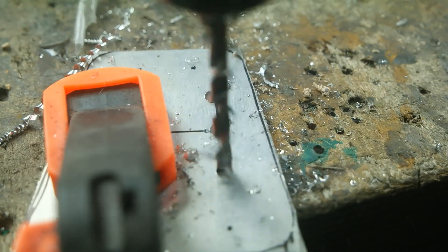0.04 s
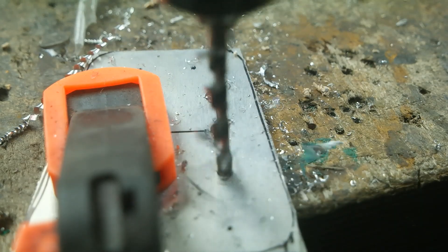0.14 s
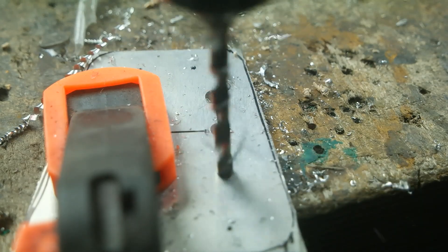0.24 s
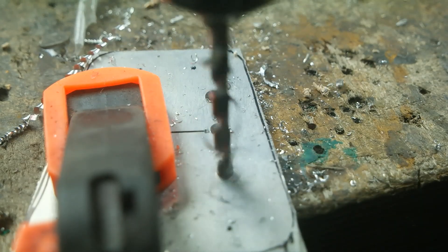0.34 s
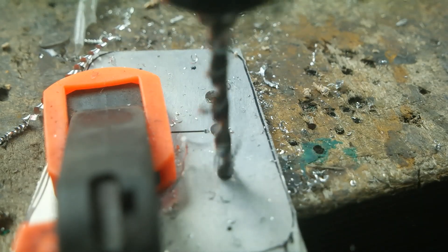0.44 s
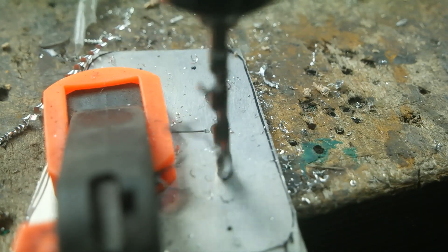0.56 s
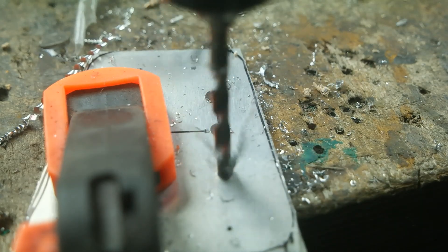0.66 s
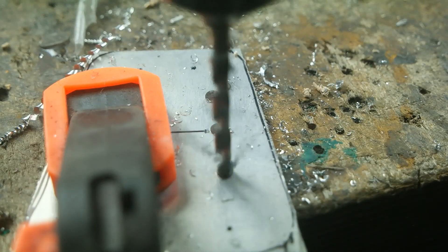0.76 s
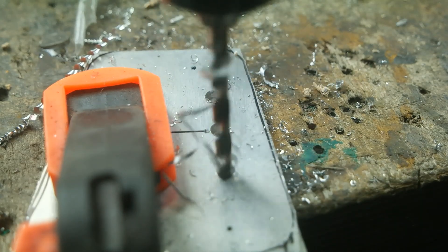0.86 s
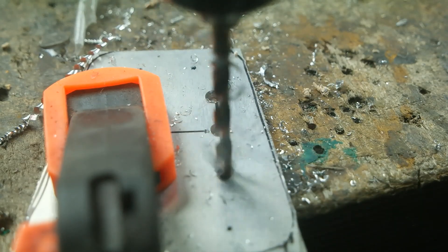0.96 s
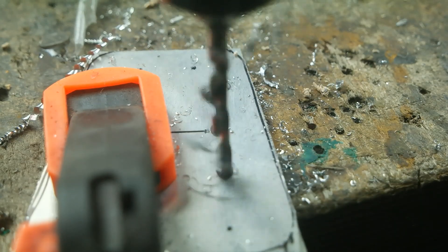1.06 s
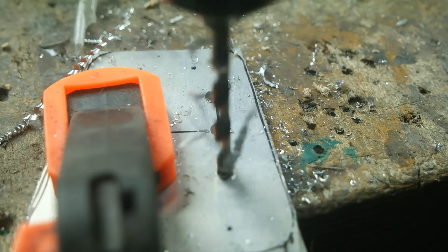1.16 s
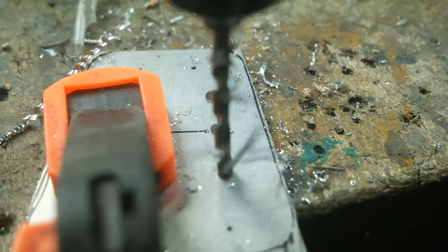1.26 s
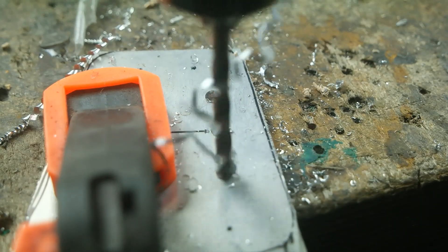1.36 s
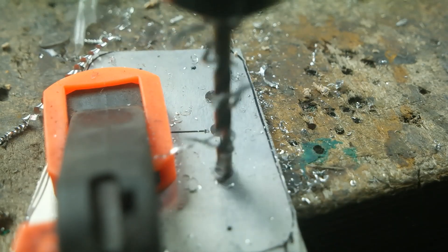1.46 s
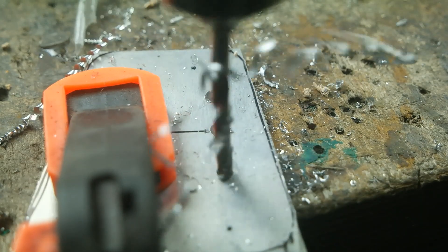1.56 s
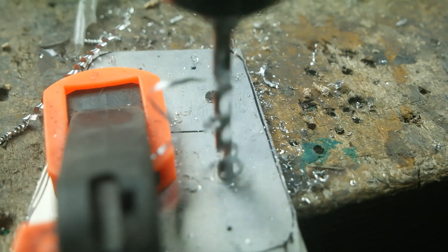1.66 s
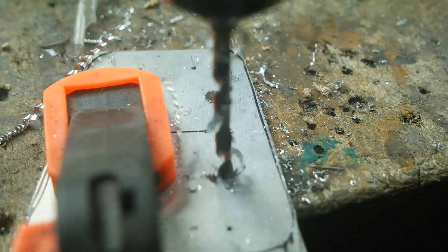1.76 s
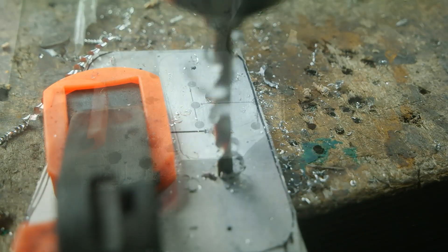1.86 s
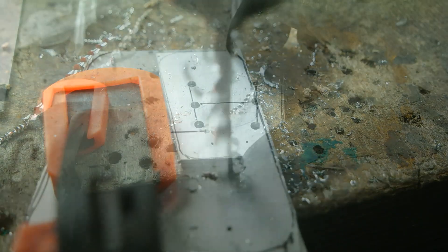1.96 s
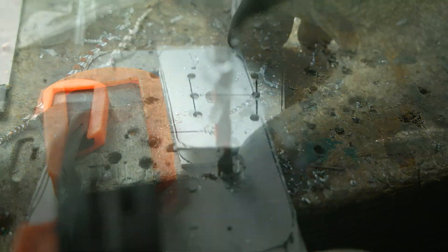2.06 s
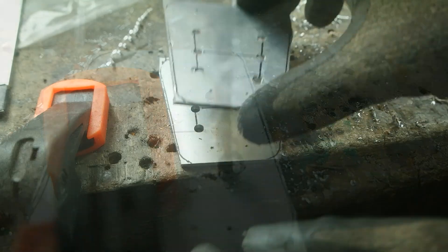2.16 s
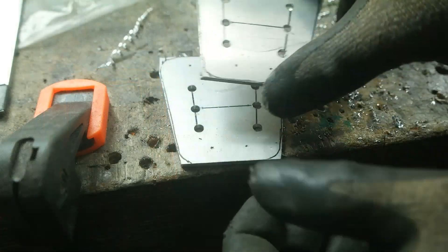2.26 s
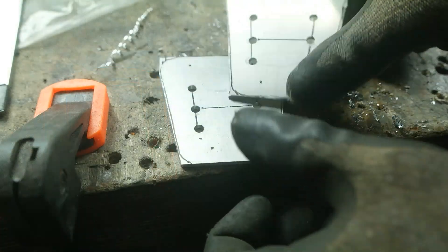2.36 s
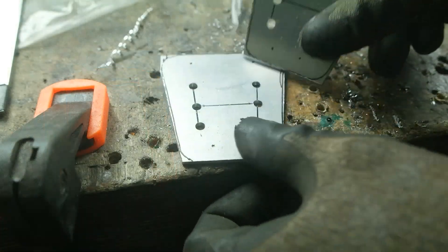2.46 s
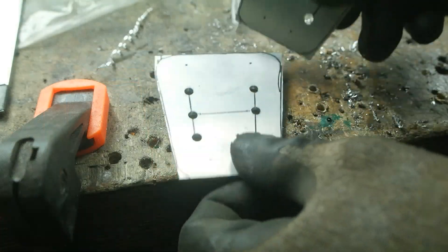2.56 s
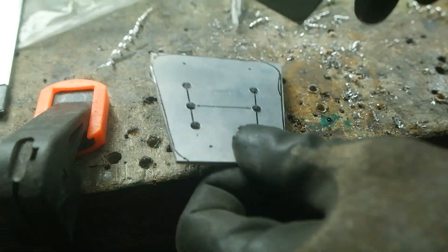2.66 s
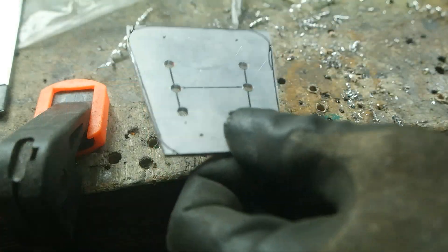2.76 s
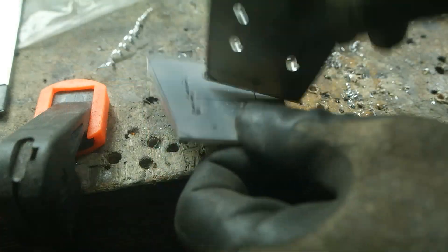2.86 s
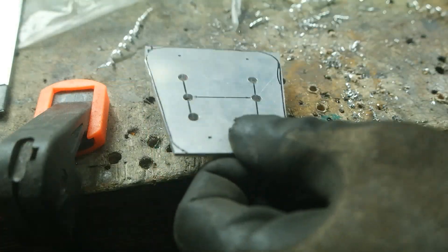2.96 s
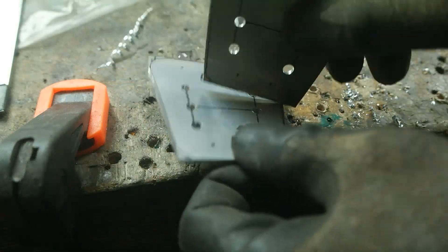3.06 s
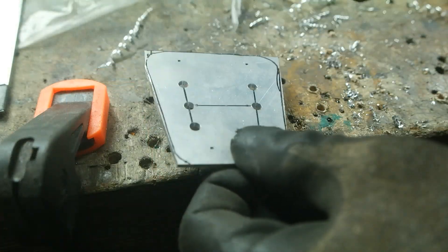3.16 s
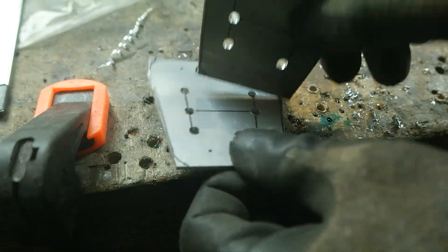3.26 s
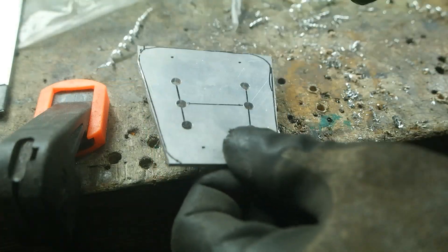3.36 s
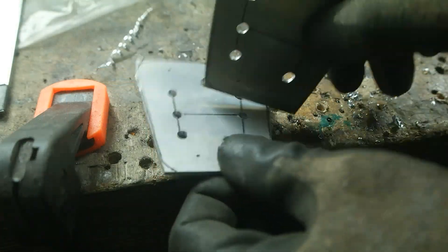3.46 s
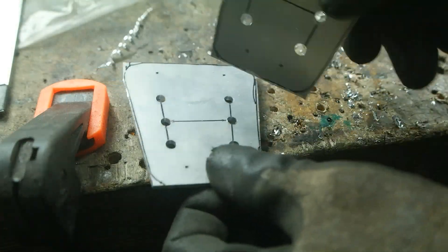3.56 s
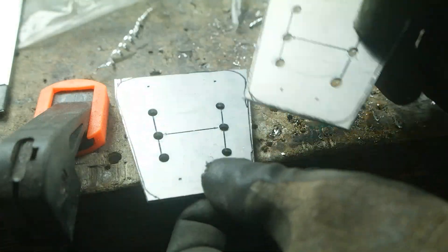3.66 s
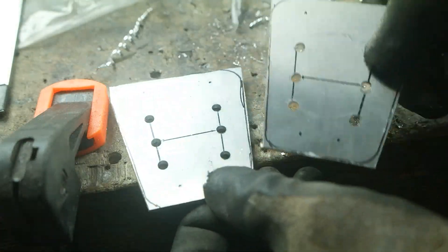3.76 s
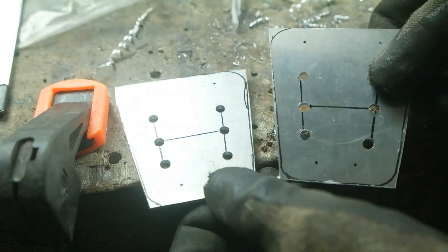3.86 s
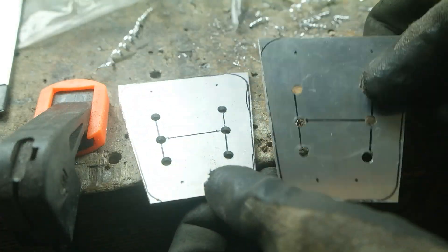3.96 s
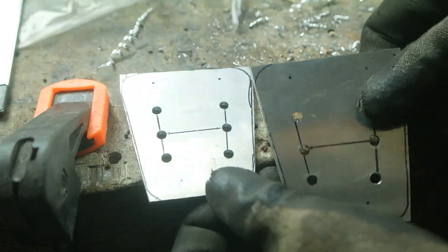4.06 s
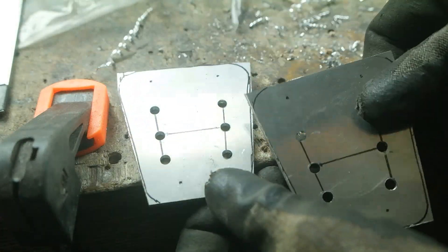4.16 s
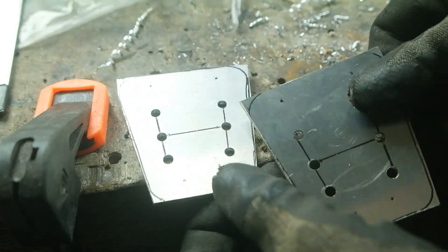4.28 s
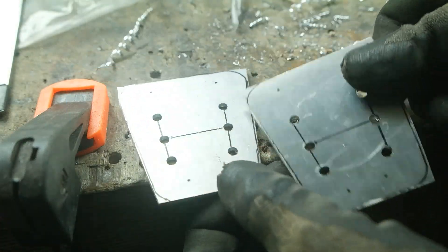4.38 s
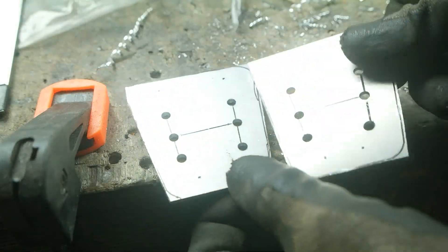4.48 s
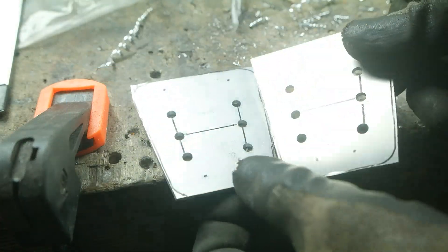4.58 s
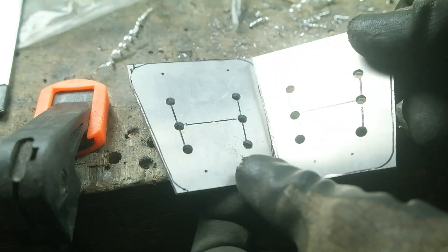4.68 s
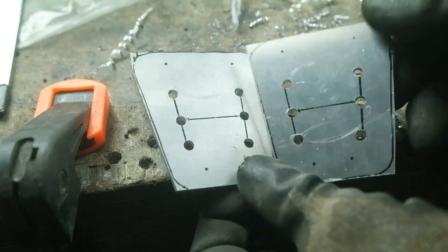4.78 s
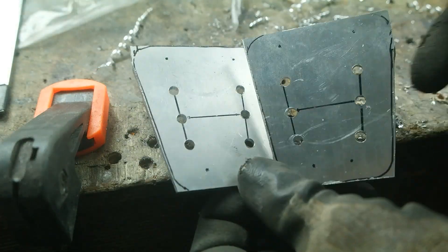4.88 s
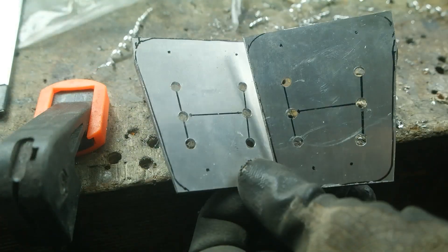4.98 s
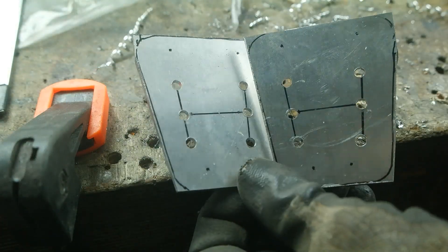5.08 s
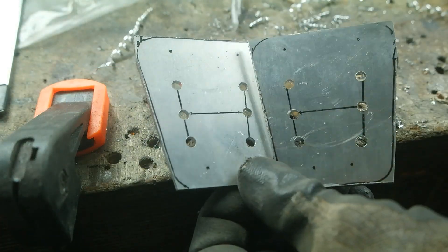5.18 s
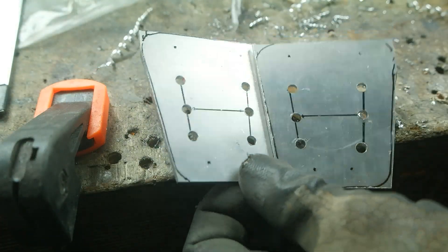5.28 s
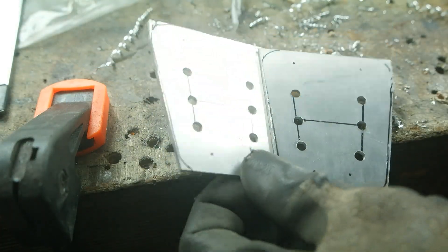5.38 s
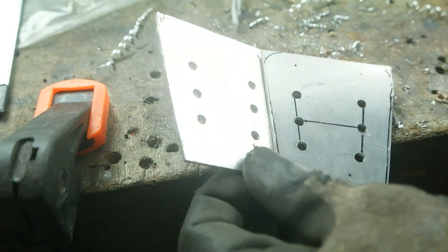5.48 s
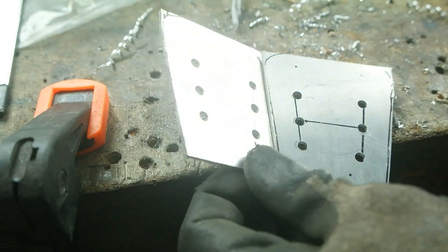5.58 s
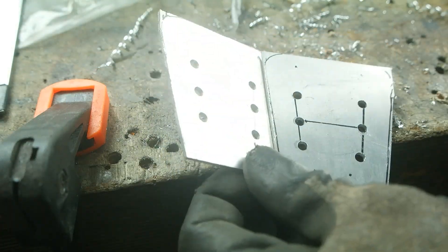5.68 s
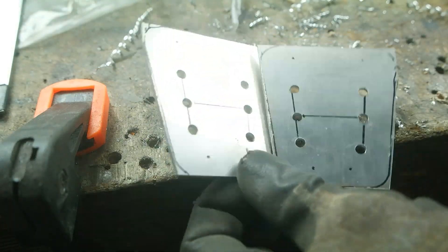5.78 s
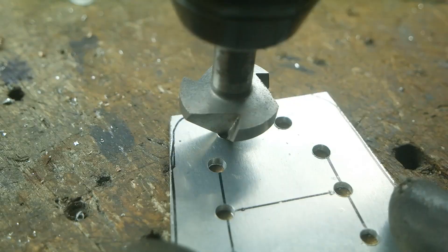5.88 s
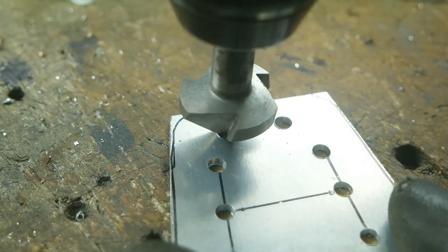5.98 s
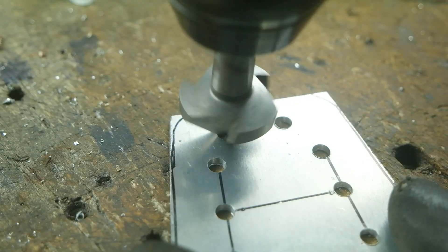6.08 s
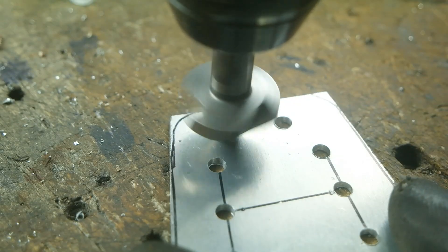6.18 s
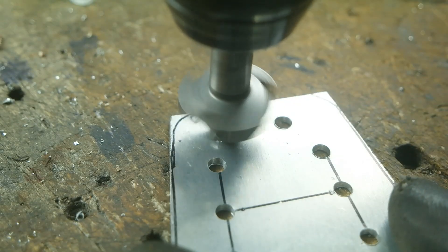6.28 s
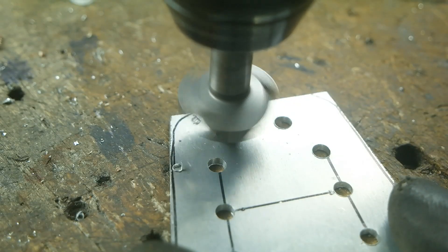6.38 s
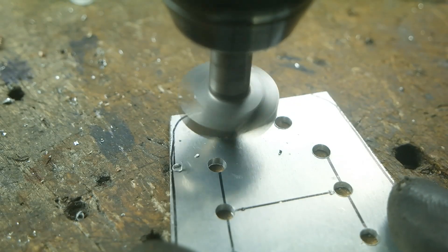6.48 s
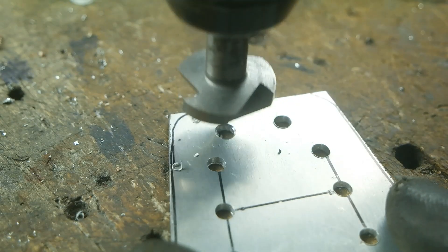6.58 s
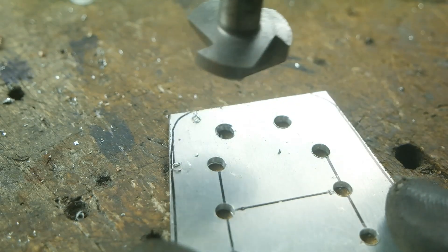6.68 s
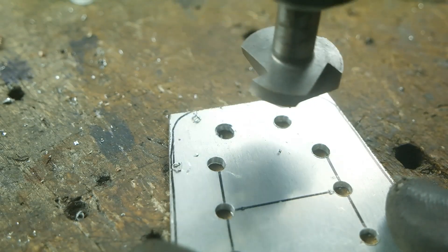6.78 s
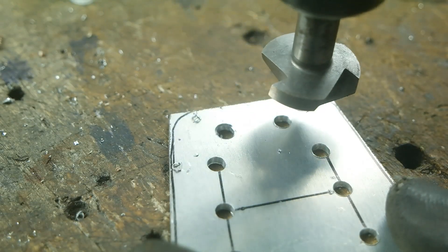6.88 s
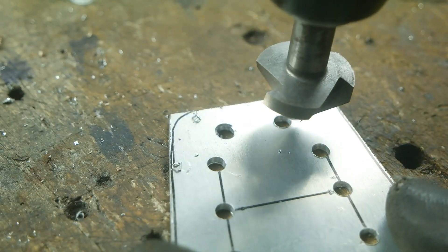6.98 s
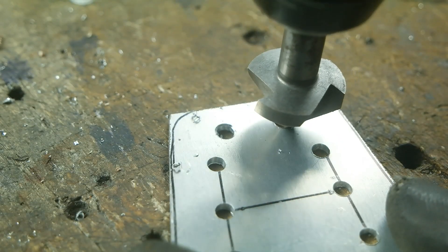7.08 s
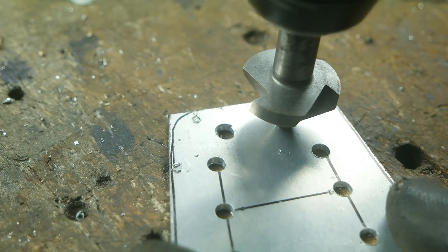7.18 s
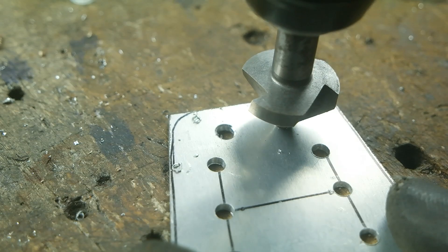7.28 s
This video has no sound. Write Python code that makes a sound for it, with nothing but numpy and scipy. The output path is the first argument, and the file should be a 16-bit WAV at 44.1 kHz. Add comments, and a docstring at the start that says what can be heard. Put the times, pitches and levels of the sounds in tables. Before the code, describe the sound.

Gritty drilling with a geared whine stops, loud distorted steel clacks echo in a workshop, and a short drill burst scrapes a hole's rim.

```python
"""An electric drill bores through a steel plate clamped to a workbench: gear tones, rumble and gritty cutting.
Gloved hands then slide and knock two small plates together, hard enough to overload the recorder:
decaying steel tones with bursts of shaped noise. A countersink is set on a hole, spun up in two
quick surges of whine and scraping, and set on the next hole. Fading noise makes the workshop ring softly."""
import sys
import numpy as np
from scipy import signal
from scipy.fft import rfft, irfft, next_fast_len
from scipy.io import wavfile

SR = 44100
rng = np.random.default_rng(int(sys.argv[2]) if len(sys.argv) > 2 else 0)


def transcribe(signal):
    """Save signal, clipped to [-1, 1], as a 16-bit WAV file at the path in sys.argv[1]."""
    frames = np.atleast_2d(signal).T
    limited = np.clip(frames, -1, 1)
    pcm = np.round(limited * 32767).astype(np.int16)
    wavfile.write(sys.argv[1], SR, pcm)


N = 323694
TIME = np.arange(N) / SR

# The ways a steel plate vibrates. Each row: pitch in Hz, relative level in dB, time to fall 60 dB in seconds.
PLATE_MODES = [(1950, -10, .025), (2130, -9, .03), (2940, 0, .05), (3130, -12, .03), (3720, -22, .03),
               (4950, -15, .025), (5520, -8, .035), (7680, -17, .03), (10500, -21, .03), (11080, -15, .04),
               (11920, -16, .035), (12330, -19, .035), (14100, -19, .035), (14600, -19, .035)]


def amp(db):
    """Turns decibels into a gain."""
    return 10 ** (np.asarray(db) / 20)


def unit(x):
    """Scales a sound to an average strength (rms) of 1."""
    return x / np.sqrt(np.mean(x ** 2) + 1e-20)


def read(points, hz):
    """Reads a table of frequency and value, with straight lines between points on a log-frequency axis."""
    f, value = np.transpose(points)
    return np.interp(np.log(hz + 1), np.log(f + 1), value)


def level(rows):
    """Gain from rows of seconds and dB, silent outside the table's times."""
    seconds, db = np.transpose(rows)
    inside = (TIME >= seconds[0]) & (TIME <= seconds[-1])
    return amp(np.interp(TIME, seconds, db)) * inside


def swell(s, hold_s, rise_db_per_s, fall_db_per_s):
    """A gain that rises to 1 at time s, holds, and falls away."""
    before_s = np.maximum(s - TIME, 0)
    after_s = np.maximum(TIME - s - hold_s, 0)
    return amp(-rise_db_per_s * before_s - fall_db_per_s * after_s)


def strongest_swell(rows, rise_db_per_s, fall_db_per_s):
    """Where several swells overlap, the strongest sets the gain."""
    swells = [amp(db) * swell(s, hold_s, rise_db_per_s, fall_db_per_s) for s, hold_s, db in rows]
    return np.max(swells, axis=0)


def dying(t, t60):
    """Exponential decay that falls 60 dB in t60 seconds."""
    return np.exp(-np.log(1000) * t / t60)


def colour(x, points):
    """Filters a sound by a table of Hz and dB."""
    size = next_fast_len(x.shape[-1] + 2048)
    gain = amp(read(points, np.fft.rfftfreq(size, 1 / SR)))
    return irfft(rfft(x, size) * gain, size)[..., :x.shape[-1]]


def noise(points, size=N):
    """Coloured noise of rms 1."""
    return unit(colour(rng.standard_normal(size), points))


def wander(rate_hz):
    """Random drift of rms 1, with straight lines between rate_hz random points a second."""
    knots = rng.standard_normal(8192)
    return unit(np.interp(TIME * rate_hz, np.arange(len(knots)), knots))


def grit(grains_hz, spread_db, share):
    """Tiny fractures of uneven size over smooth friction; share is the grains' part of the power."""
    hits = rng.random(N) < grains_hz / SR
    size = amp(spread_db * np.minimum(rng.exponential(1, N), 2))
    grains = hits * rng.standard_normal(N) * size
    return np.sqrt(share) * unit(grains) + np.sqrt(1 - share) * rng.standard_normal(N)


def add(track, s, sound):
    """Mixes a sound in at s seconds."""
    part = track[round(s * SR):][:len(sound)]
    part += sound[:len(part)]


def drill(sway=0.0018, jitter=0.0014, throb=0.65, flutter=0.31, hum_db=-1, cut_db=-21, rumble_db=-35):
    """Gears sing over the cutting edges; the load swings once every turn of the chuck."""
    # Motor hum. Each row: pitch in Hz at the table's mesh rate, relative level in dB.
    motor_tones = [(161.5, -51), (215.3, -47), (269.2, -42.5)]
    # Gear tones. Each row: pitch in Hz at the table's mesh rate, level in dB under full load.
    gear_tones = [(646.0, -39), (861.3, -49), (1249, -44), (1292, -37), (1771, -45), (1895, -37),
                  (2261, -45), (2417, -37), (2536, -43), (2934, -44), (3214, -45), (3445, -47),
                  (3871, -36.5), (4307, -43), (4850, -39)]
    # Colour of the cutting. Each row: frequency in Hz, relative dB per Hz.
    cutting = [(80, -68), (300, -16.5), (900, -13), (1350, 0.5), (1620, -6.5), (1900, 4.5), (2150, -1),
               (2900, 3.5), (3700, -3), (5000, -3), (7300, -5.5), (9500, -10.5), (11500, -9), (13000, -12),
               (16000, -7.5)]
    # Colour of the low rumble. Each row: frequency in Hz, relative dB per Hz.
    rumble = [(30, -43), (100, -34.5), (150, -19), (215, -12), (290, -2.5), (370, -10.5), (520, -6.5),
              (800, -6), (1300, -17), (2800, -19.5), (6000, -42.5), (15000, -48)]
    table_mesh_hz, teeth = 645, 60  # the tables' mesh rate; gear teeth per turn of the chuck
    on = TIME < 2.044  # the drill is silent after this many seconds

    # the trigger is let go: the motor coasts, slower and quieter
    release_s, coast_s, coast_db_per_s = 1.707, 0.79, 31.5
    coasting_s = np.maximum(TIME - release_s, 0)
    motor = amp(-coast_db_per_s * coasting_s)

    # the gear mesh rate holds, then sags as the bit digs in
    free_mesh_hz, sag_from_s, sag_hz_per_s = 646.5, .92, 58
    sagging_s = np.clip(TIME - sag_from_s, 0, release_s - sag_from_s)
    mesh_hz = (free_mesh_hz - sag_hz_per_s * sagging_s) * np.exp(-coasting_s / coast_s)
    chuck = 2 * np.pi * np.cumsum(mesh_hz) / SR / teeth  # angle in radians
    uneven = 1 + sway * np.sin(chuck) + jitter * wander(90)
    turns = np.cumsum(mesh_hz * uneven) / SR  # gear mesh cycles so far

    # the bit comes out of the cut over lift_s; only the brushes' hiss stays, idle_db against the cutting
    cut_end_s, lift_s, idle_db = 1.864, 0.072, -23
    in_cut = np.clip((cut_end_s - TIME) / lift_s, 0, 1)
    cut = np.sqrt(in_cut + amp(idle_db) ** 2) * motor

    # the bit grabs once and the motor's hum swells, by as much as its full-speed level
    grab = swell(1.7, 0.037, rise_db_per_s=250, fall_db_per_s=250)
    hum_load = amp(hum_db) * (motor ** 3 + grab)
    gear_load = (cut * motor) ** 2

    sound = amp(rumble_db) * motor * noise(rumble)
    # the load swings tones near this multiple of the mesh rate most deeply, over this many octaves
    throb_order, throb_octaves = 2.5, .9
    for tones, load in ((motor_tones, hum_load), (gear_tones, gear_load)):
        for hz, db in tones:
            octaves = np.log2(hz / (throb_order * table_mesh_hz))
            depth = throb * np.exp(-(octaves / throb_octaves) ** 2)
            swing = depth * np.sin(chuck[on] + 2 * np.pi * rng.random())
            tone = np.sin(2 * np.pi * (hz / table_mesh_hz * turns[on] + rng.random()))
            unsteady = 1 + swing + flutter * wander(44.85)[on]
            sound[on] += np.sqrt(2) * amp(db) * load[on] * unsteady * tone

    # the cutting swells four times a turn, and more gently once a turn
    bite = amp(.45 * np.sin(4 * chuck) + 0.33 * np.sin(chuck) + 0.16 * wander(260))
    chips = unit(colour(grit(grains_hz=2640, spread_db=8.5, share=0.19), cutting) * bite)
    return (sound + amp(cut_db) * cut * chips) * on


def plate_ring(t, bright_db):
    """The plate's modes, damped by the grip; bright_db tilts them per octave."""
    hz, db, t60 = np.transpose(PLATE_MODES)[:, :, None]
    phase = 2 * np.pi * rng.random(hz.shape)
    strength = amp(db + bright_db * np.log2(hz / hz[1]))
    return (strength * dying(t, t60) * np.sin(2 * np.pi * hz * t + phase)).sum(0)


def plates(crack_db=-5, crack_t60=0.034, knock_t60=0.024, contact_s=0.00082, hiss_db=-1, drag_db=-12):
    """Each blow cracks, rings the steel and knocks the bench; sliding rubs the same modes.

    Gives the direct sound and what goes to the room."""
    # Plate against plate. Each row: start in seconds, level in dB, then relative to that
    # the ring in dB, the bench knock in dB and the sound sent to the room in dB.
    clacks = [(2.423, -4, -11.5, -26, -19), (2.447, -3.5, -16, -14, 8.5), (2.495, -8.5, -5, -8, 0),
              (2.662, 2.5, -28, -19.5, -10.5), (2.9174, 8, -3.5, -19.5, -0.5),
              (3.097, 3.5, -2.5, -15.5, 1.5), (3.291, 2, 0, -15, -3.5), (3.296, -2, -16, -15.5, 5.5),
              (3.4868, 5, -10, -16.5, 3), (4.491, -46.5, 5.5, 4, -2), (4.558, -46, 5, -16, -5),
              (4.666, -48.5, 7.5, 6, 6.5), (4.701, -49, 2, 7.5, -2), (4.822, -53.5, -1.5, -5, -1)]
    # One plate sliding on the other. Each row: start of the hold in seconds, hold in seconds, ring in dB,
    # ring tilt in dB per octave, rasp in dB relative to the ring.
    slide_rows = [(2.36, 0.024, -83, 4, -8), (2.495, 0.025, -20, 12, -1), (4.047, 0.022, -57, 6, -6),
                  (4.32, 0.035, -60.5, 5, -13.5), (4.438, .02, -61, 11.5, -10), (4.52, 0.14, -62, 3, -16)]
    # Colour of the crack and of the rubbing hiss. Each row: frequency in Hz, relative dB per Hz.
    crack_colour = [(40, -15.5), (300, -12.5), (1300, -5.5), (2000, 4), (3200, 9), (4400, 1.5), (5400, 5.5),
                    (6500, -5.5), (7700, 2), (9600, -5.5), (12000, -5), (13300, 0), (14500, 0.5),
                    (16000, -13.5)]
    # Colour of the wooden bench. Each row: frequency in Hz, relative dB per Hz.
    bench_knock = [(40, -27.5), (150, -19), (300, -7.5), (600, -9), (1000, -5.5), (2000, -16.5),
                   (8000, -49)]
    # Rubbing excites the plate's modes unevenly. Each row: frequency in Hz, gain in dB.
    squeal_colour = [(2000, -10), (3000, -2), (4000, -6), (4950, -2), (5500, 5), (7700, -3), (11000, -2),
                     (15000, -4)]
    bright_db = 1.5  # tilt of a blow, per octave
    t = np.arange(SR // 6) / SR
    slides, blows, feed = np.zeros(N), np.zeros(N), np.zeros(N)

    rub = grit(grains_hz=1540, spread_db=0, share=0.4)
    friction = amp(hiss_db) * unit(colour(rub, crack_colour)) + amp(drag_db) * noise(bench_knock)
    for s, hold_s, db, tilt_db, rasp_db in slide_rows:
        ring = colour(plate_ring(t, tilt_db), squeal_colour)
        squeal = unit(signal.oaconvolve(rub, ring)[:N])
        gain = amp(db) * swell(s, hold_s, rise_db_per_s=281, fall_db_per_s=497.5)
        slides += gain * (squeal + amp(rasp_db) * friction)

    tilt_from_hz = PLATE_MODES[1][0]
    tilted = [(hz, band_db + bright_db * np.log2(max(hz / tilt_from_hz, 1))) for hz, band_db in crack_colour]
    for s, db, ring_db, knock_db, room_db in clacks:
        crack = amp(crack_db) * noise(tilted, size=len(t)) * dying(t, crack_t60)
        knock = amp(knock_db) * noise(bench_knock, size=len(t)) * dying(t, knock_t60)
        ring = amp(ring_db) * plate_ring(t, bright_db)
        onset = 1 - np.exp(-t / contact_s)
        blow = amp(db) * (ring + crack + knock) * onset
        add(blows, s, blow)
        add(feed, s, amp(room_db) * blow)
    return slides + blows, slides + feed


def countersink(scrape_db=-2.0):
    """The flutes scrape the rim of the hole, brighter as they cut in, and ring the bit."""
    # How hard the flutes bite. Each row: time in seconds, relative level in dB.
    bite = [(6.034, -32), (6.095, -14.5), (6.235, -10.5), (6.32, -16), (6.612, -17.5), (6.62, -32),
            (6.65, -35.5)]
    # Colour of the scraping. Each row: frequency in Hz, relative dB per Hz.
    scrape_colour = [(59, -69), (100, -31), (210, -15.5), (328, -19.5), (406, -19), (481, -16.5),
                     (1060, -12.5), (1610, -16), (2630, -4), (2990, -6), (4470, -2), (7140, -2.5),
                     (8280, -5.5), (10200, -4.5), (16000, -11.5)]
    # Extra filter at first touch, when the scraping is dull. Each row: frequency in Hz, gain in dB.
    dull = [(100, -0.5), (1200, 5.5), (2500, 2.5), (6500, 2), (9000, -5.5), (15000, -9)]
    brighten_s = 0.23
    rough = grit(grains_hz=1860, spread_db=2.0, share=0.21) * amp(1.1 * wander(170))
    scrape = unit(colour(rough, scrape_colour))
    depth = np.clip((TIME - bite[0][0]) / brighten_s, 0, 1) ** 2
    scrape = depth * scrape + (1 - depth) * colour(scrape, dull)
    ring_hz, ring_width_hz, ring_db = 5390, 25, -18  # the bit's own ring
    resonance = signal.iirpeak(ring_hz, ring_hz / ring_width_hz, SR)
    ring = amp(ring_db) * unit(signal.lfilter(*resonance, scrape))
    return amp(scrape_db) * level(bite) * (scrape + ring)


def whine(jitter=.005, flutter=.5):
    """The motor climbs toward its top speed with each surge; the gears are loudest while it strains."""
    # Tones of the whine. Each row: multiple of the shaft rate, relative dB in the first surge,
    # relative dB in the second.
    tone_rows = [(1, -25, -14), (3, -16, -9), (4, -14, -30), (5, -30, -2), (9, -20, -4), (11.25, -20, 0),
                 (12, -2, -30), (15, -20, -4), (16, 0, -30), (18, -20, 0), (20, -2, -6), (22.5, -20, -1),
                 (24, -4, -18), (28, -5, -14), (30, -20, 0), (32, -6, -20), (33.75, -20, 1), (36, -8, -3)]
    # The bit and plate radiate best in the middle treble. Each row: frequency in Hz, gain in dB.
    radiation = [(100, -35), (500, -11), (900, -7), (1250, -2), (1550, -12), (2100, 0), (2700, 0),
                 (3700, 0), (4500, 1), (6700, 1), (8000, -4), (9200, -1), (10500, -7), (16000, -18)]
    # The motor's two starts. Each row: start from rest in seconds, time to half speed in seconds,
    # in gear from in seconds, fade-in in seconds, trigger let go in seconds.
    surges = [(5.974, .101, 6.06, .04, 6.19), (6.187, .0395, 6.194, .008, 6.565)]
    top_shaft_hz, run_down_s = 338, .4
    # level at full speed, rise under full strain, fall once the trigger is let go
    full_speed_db, strain_db, fall_db_per_s = -23.5, 14, 350
    out = np.zeros(N)
    orders, *surge_dbs = np.transpose(tone_rows)
    for (start_s, half_s, gear_s, fade_s, stop_s), dbs in zip(surges, surge_dbs):
        on = (TIME > gear_s) & (TIME < stop_s + run_down_s)
        t = TIME[on]
        speed = (t - start_s) / (t - start_s + half_s)  # as a share of top speed
        coasting_s = np.maximum(t - stop_s, 0)
        shaft_hz = top_shaft_hz * speed * np.exp(-coasting_s / run_down_s)
        turns = np.cumsum(shaft_hz * (1 + jitter * wander(200)[on])) / SR
        tones = np.zeros(len(t))
        for order, db in zip(orders, dbs):
            tone = np.sin(2 * np.pi * (order * turns + rng.random()))
            tones += amp(db) * (1 + flutter * wander(70)[on]) * tone
        fade_in = np.minimum((t - gear_s) / fade_s, 1)
        gain = fade_in * amp(full_speed_db + strain_db * (1 - speed) - fall_db_per_s * coasting_s)
        out[on] += gain * unit(colour(tones, radiation))
    return out


def handling():
    """Glove rustle, dry ticks of metal and the dull shake of the bench, all shaped noise."""
    # Gloves shifting the plates. Each row: start of the hold in seconds, hold in seconds, level in dB.
    rustles = [(4.07, 0.075, -56), (4.29, 0.44, -55.5), (5.29, 0.1, -59.5)]
    # The drill's weight shakes the bench as it is set down. Each row: start of the hold in seconds,
    # hold in seconds, level in dB.
    set_downs = [(5.871, 0.2, -55.5), (7.149, 0.012, -44.5), (7.24, 0.037, -50.5)]
    # Small hard contacts of bit and plate. Each row: start in seconds, level in dB.
    ticks = [(5.168, -47), (5.865, -40), (5.871, -45), (5.926, -42.5), (5.959, -34), (6.036, -37),
             (6.044, -27.5), (6.055, -8), (6.607, -10), (7.142, -41), (7.155, -37), (7.16, -33.5),
             (7.1918, -34.5), (7.257, -34.5), (7.2666, -38)]
    # Colour of the gloves. Each row: frequency in Hz, relative dB per Hz.
    glove = [(35, -41.5), (60, -17), (287, 2), (389, -2), (666, 1), (842, -4), (1820, -6.5), (2050, -5),
             (4640, -11), (5460, -9), (6000, -12.5), (16000, -12.5)]
    # Colour of a tick. Each row: frequency in Hz, relative dB per Hz.
    tick_colour = [(100, -24.5), (900, -14), (1800, -15), (2600, 0), (3500, -10), (4500, -5.5),
                   (6000, -13.5), (9000, -16.5), (16000, -22)]
    # Colour of the shaking bench. Each row: frequency in Hz, relative dB per Hz.
    bench = [(30, -19), (100, -26), (170, 4), (240, -7), (400, -11), (1200, -17.5), (3000, -22),
             (7000, -27), (16000, -35)]
    rustle = strongest_swell(rustles, rise_db_per_s=88.5, fall_db_per_s=38)
    shake = strongest_swell(set_downs, rise_db_per_s=1502, fall_db_per_s=107.5)
    out = rustle * unit(colour(grit(grains_hz=960, spread_db=6.0, share=0.13), glove))
    t = np.arange(SR // 10) / SR
    for s, db in ticks:
        add(out, s, amp(db) * noise(tick_colour, size=len(t)) * dying(t, t60=0.019))
    return out + shake * noise(bench)


def stereo(source):
    """A second run with fresh random draws gives a quieter, unrelated side signal, mostly in the treble."""
    # Side against middle. Each row: frequency in Hz, gain in dB.
    width = [(50, -10), (150, -16), (1000, -16), (2500, -12), (5000, -8.5), (9000, -5), (14000, -3)]
    mid = source()
    side = colour(source(), width)
    return np.array([mid + side, mid - side])


def workshop(x, hold_s=0.13, side_db=-6):
    """A diffuse tail holds briefly, then dies band by band; it keeps passing smoothly between three noise tails."""
    # How long the room rings. Each row: frequency in Hz, time to fall 60 dB in seconds.
    room_t60 = [(100, .9), (500, 1), (3000, .68), (8000, .58), (15000, 0.44)]
    # three stereo tails of noise, one second each
    hz, t, bands = signal.stft(rng.standard_normal((3, 2, SR)), SR, nperseg=256)
    fall_db = -60 * np.maximum(t - hold_s, 0) / read(room_t60, hz)[:, None]
    tails = signal.istft(bands * amp(fall_db), SR, nperseg=256)[1]
    tails = tails / np.linalg.norm(tails[0, 0])
    # the sound passes from tail to tail at steady total power
    feeds = np.sqrt(2 / 3) * np.sin(np.pi * (20 * TIME + np.arange(3)[:, None] / 3))
    mid, side = signal.fftconvolve((x * feeds)[:, None], tails, axes=2).sum(0)[:, :N]
    return np.array([mid + amp(side_db) * side, mid - amp(side_db) * side])


def air(floor_db=-70):
    """The quiet of the workshop, as steady soft noise."""
    # Colour of the quiet. Each row: frequency in Hz, relative dB per Hz.
    floor = [(15, -46.5), (25, -14.5), (242, -5.5), (439, -7), (677, -2.5), (1290, -9), (2160, -9.5),
             (6920, -18), (14000, -13.5), (16000, -15.5)]
    return amp(floor_db) * noise(floor)


def scene(right_db=.5):
    """Close sources, the workshop's tail and its quiet air."""
    # What the plates send into the room. Each row: frequency in Hz, gain in dB.
    plate_send = [(60, -9), (130, -5), (200, -6.5), (480, -0.5), (750, -8), (1300, -14.5), (2000, -11.5),
                  (2500, -12.5), (3000, -13.5), (5000, -16), (7000, -14), (14000, -13.5)]
    # What the bit and the handling send into the room. Each row: frequency in Hz, gain in dB.
    bit_send = [(60, -14.5), (200, -7.5), (600, -9), (1200, -6), (2500, -16.5), (7000, -25.5), (14000, -27)]
    steel, steel_feed = stereo(lambda: np.array(plates())).swapaxes(0, 1)
    bit = stereo(countersink) + stereo(handling)
    room = workshop(colour(steel_feed.mean(0), plate_send) + colour(bit.mean(0), bit_send))
    balance = amp([[-right_db], [right_db]])  # left down, right up
    return stereo(drill) + (steel + bit + stereo(whine) + room) * balance + stereo(air)


def record(dry, ceiling_db=-6, recover_db_per_s=1500, attack_s=0.0024, lopsided=0.04):
    """A fast limiter, overload on the hardest blows, then the band limit."""
    pole = np.exp(-1 / (attack_s * SR))
    power = signal.lfilter([1 - pole], [1, -pole], (dry ** 2).mean(0))
    power_db = 10 * np.log10(power + 1e-12)
    # follow the peaks, letting go at the recovery rate
    fall = TIME * recover_db_per_s
    peak_db = np.maximum.accumulate(power_db + fall) - fall
    limited = dry / amp(np.maximum(peak_db - ceiling_db, 0))
    # overload bends the two half-waves unequally, which adds a low thump
    bent = limited + lopsided * np.maximum(abs(limited) - 2 / 3, 0)
    clipped = np.clip(bent, -1, 1)
    edge_hz = 15900
    lowpass = signal.firwin(401, edge_hz, window=("kaiser", 8), fs=SR)
    return signal.oaconvolve(clipped, lowpass[None], "same")


dry = scene()
out = record(dry)
transcribe(out)
```